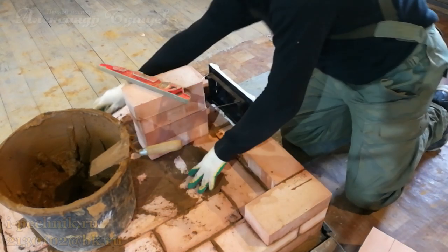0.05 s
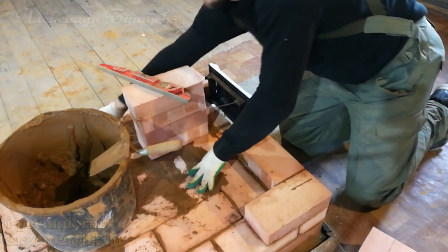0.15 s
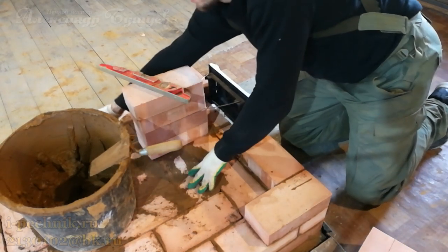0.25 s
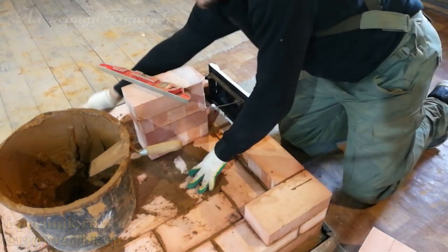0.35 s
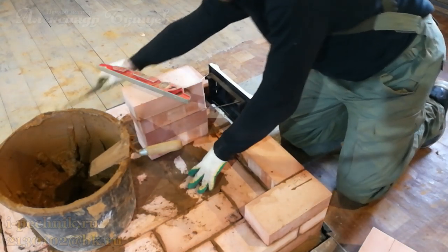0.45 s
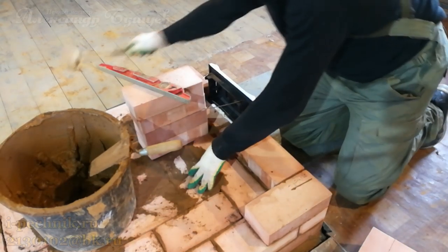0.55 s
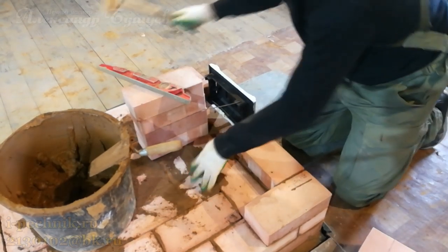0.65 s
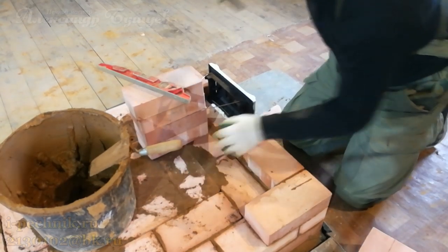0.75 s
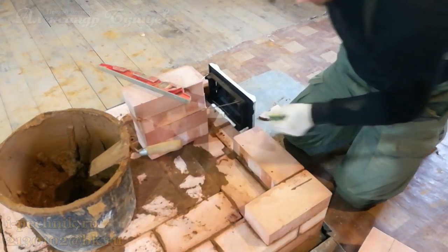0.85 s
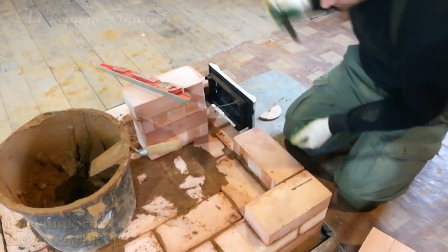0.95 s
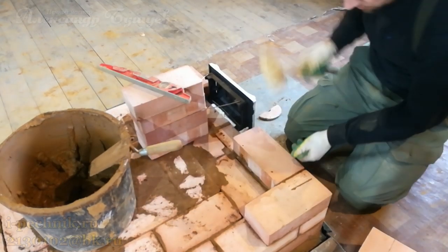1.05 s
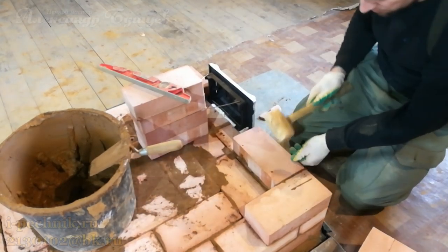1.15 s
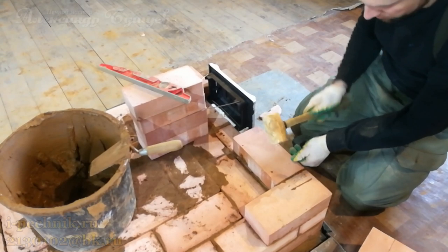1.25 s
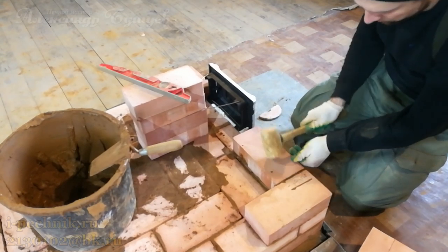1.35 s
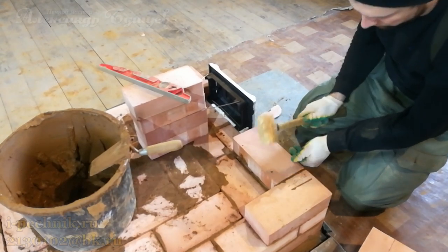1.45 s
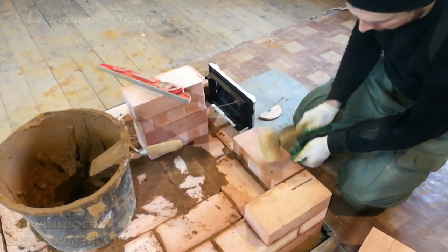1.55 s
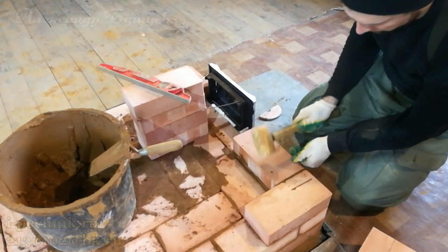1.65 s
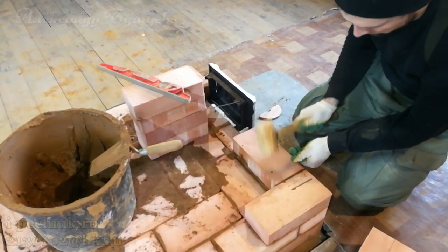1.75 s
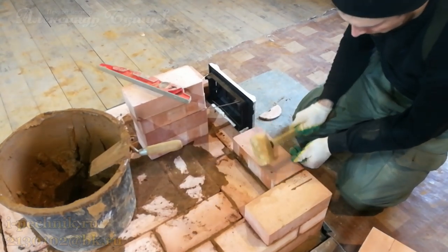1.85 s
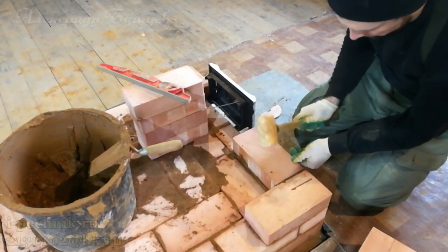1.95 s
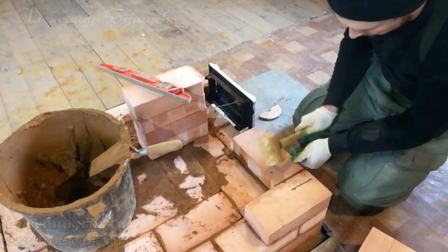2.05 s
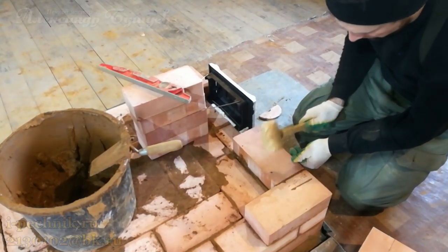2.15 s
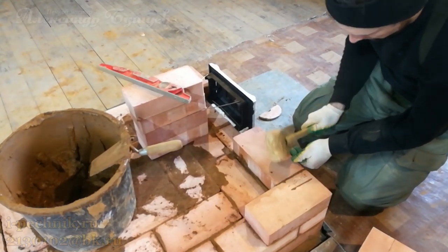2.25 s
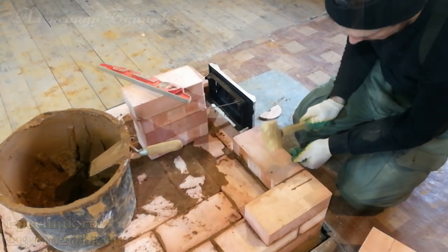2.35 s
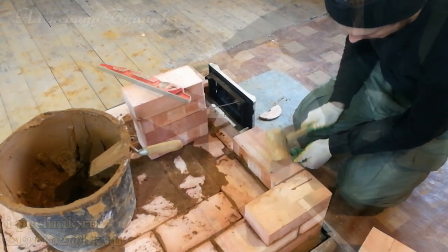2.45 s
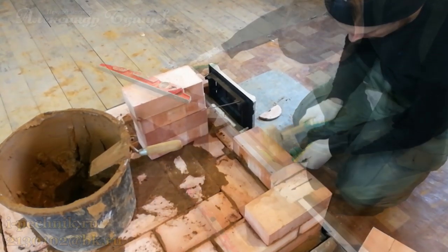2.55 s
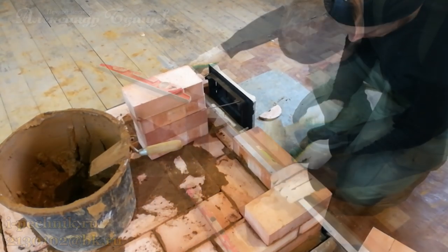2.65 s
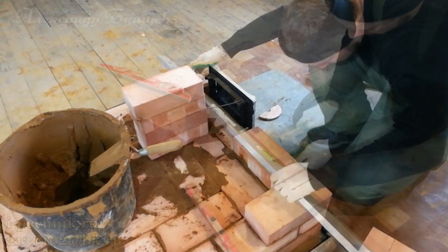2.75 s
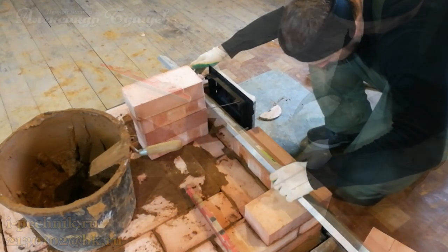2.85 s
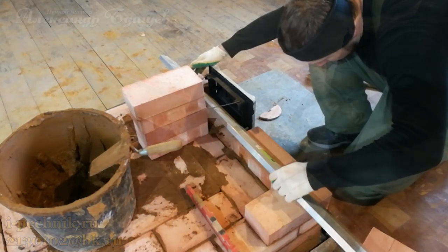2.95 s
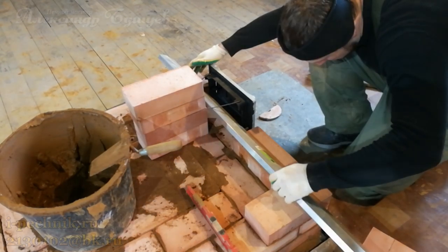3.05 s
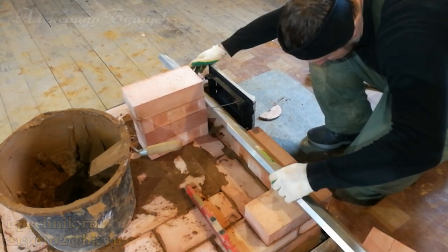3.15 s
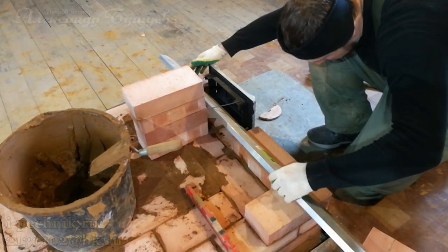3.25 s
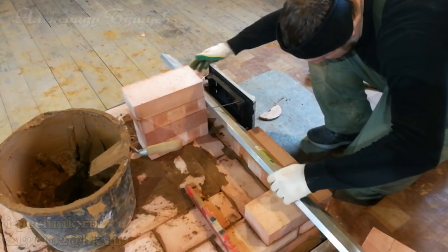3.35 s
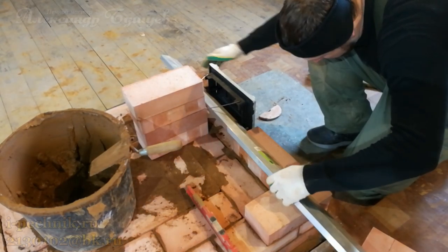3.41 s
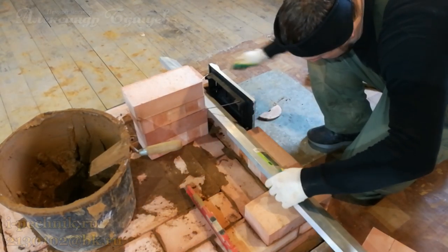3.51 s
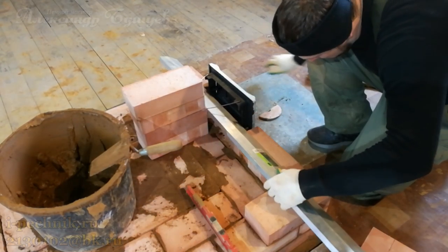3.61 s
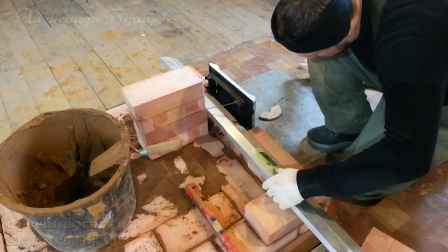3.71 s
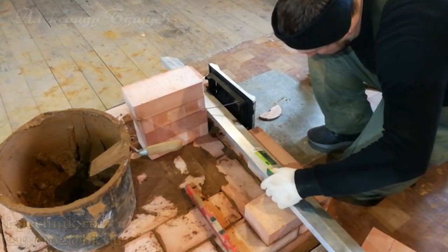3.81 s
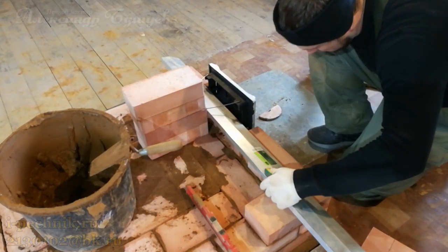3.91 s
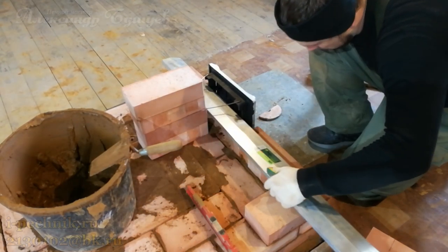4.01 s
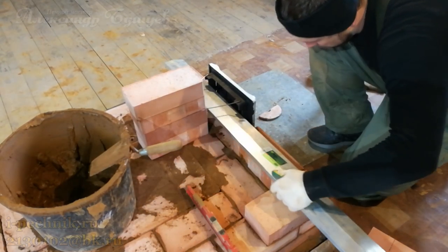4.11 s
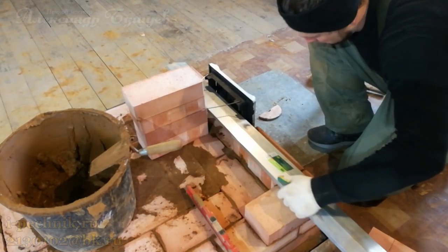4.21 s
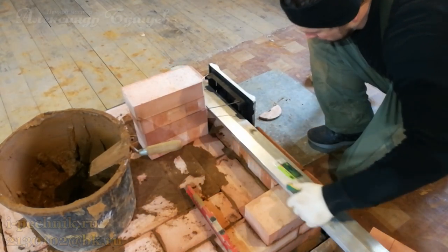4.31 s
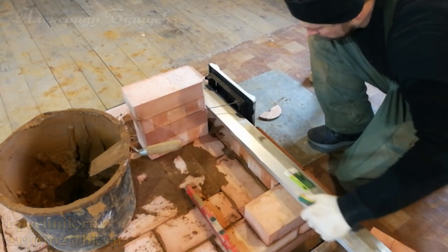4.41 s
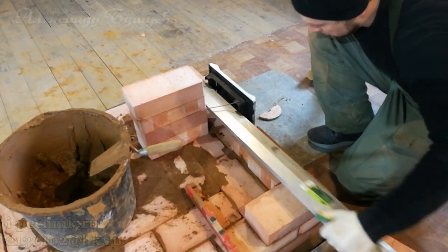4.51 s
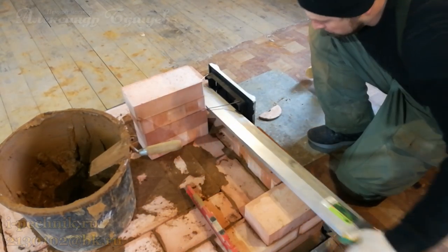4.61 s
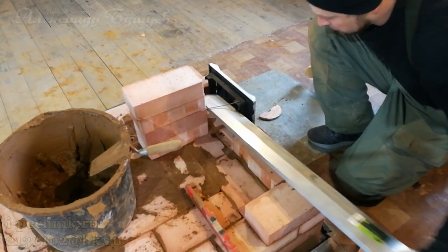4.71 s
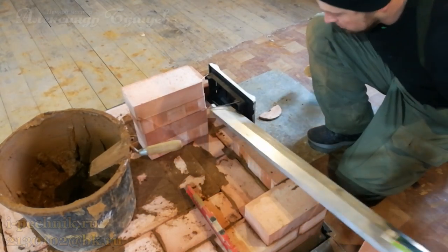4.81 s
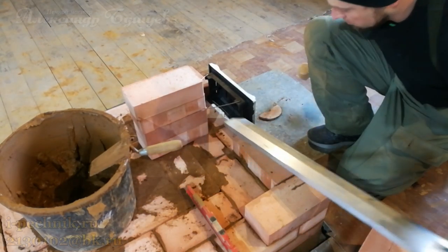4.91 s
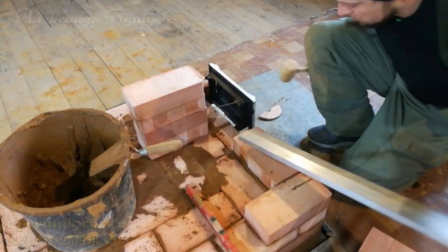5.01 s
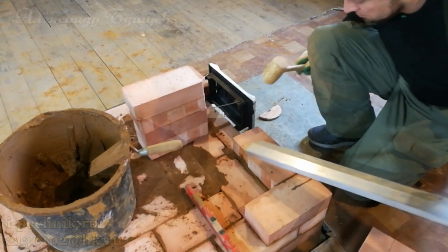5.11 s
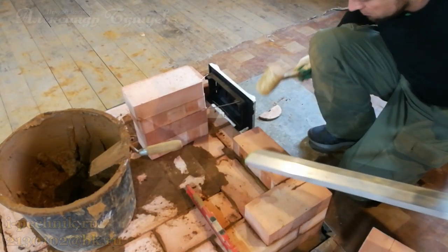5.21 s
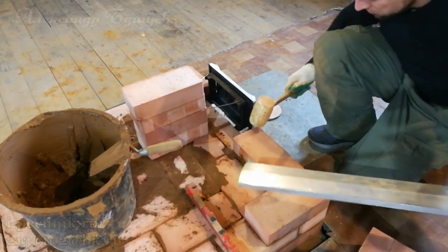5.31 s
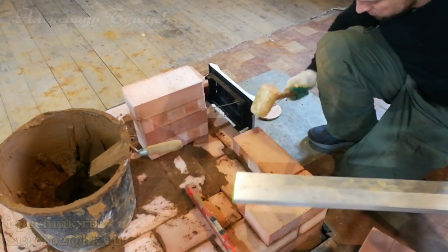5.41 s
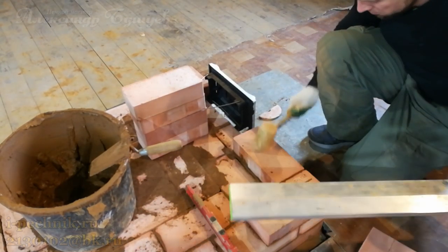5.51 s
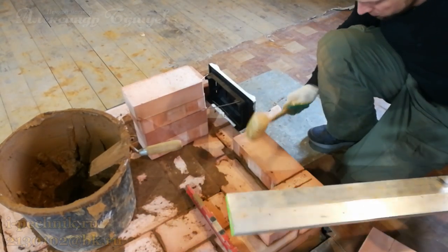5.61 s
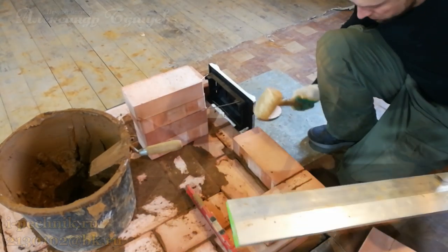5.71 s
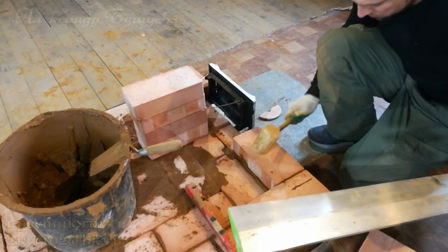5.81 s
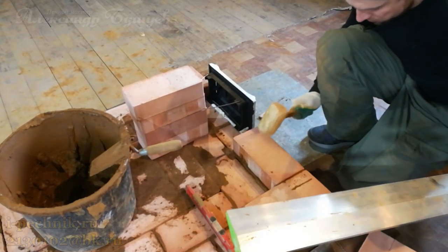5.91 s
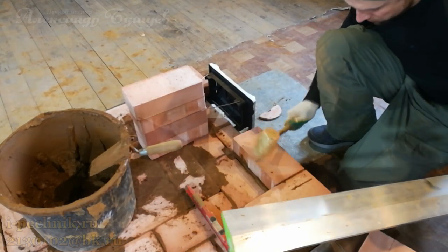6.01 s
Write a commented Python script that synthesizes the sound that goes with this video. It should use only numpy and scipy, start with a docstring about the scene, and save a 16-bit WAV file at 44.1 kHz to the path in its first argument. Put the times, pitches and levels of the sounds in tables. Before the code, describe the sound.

For the first second or so, work clothes rustle softly and gloves and soles scuff, over very quiet room air and a faint low hum that fades. From 1.3 to 2.9 seconds a rubber mallet taps a brick eight times, evenly, about four a second, the last weaker. Each is a dull thud with a slap and a short boom in the small room. From about 2.3 to 3.9 seconds a hollow aluminium level scrapes over grit in small catches, clinking faintly against an iron door around 3 seconds. It clatters on the brick with a brief metallic ring at 3.5, knocks more lightly at 4.1 and gives a sharp ringing tap at 4.6. Faint sleeve swishes and soft floorboard bumps lie between. Three harder mallet blows land at about 5.5, 5.7 and 6 seconds.

```python
"""A rubber mallet beds a brick in a small workshop: each impact swings brick and floor once, echoes off
walls and ceiling and excites the room's standing waves. A hollow aluminium level scrapes over the grit,
chatters against an iron firebox door, and rings in its tube modes as it is set down, knocked and lifted.
Three harder blows follow. The kneeling bricklayer's clothes rustle by friction, gloves and soles scuff,
and the boards bump as the weight shifts, over quiet room air and a brief low hum."""
import sys
import numpy as np
from scipy import signal
from scipy.fft import rfft, irfft, next_fast_len
from scipy.io import wavfile
from scipy.ndimage import uniform_filter1d

SR = 44100
rng = np.random.default_rng(int(sys.argv[2]) if len(sys.argv) > 2 else 0)


def master_out(mix):
    """Clip the mix to full scale and print it as 16-bit PCM to the path in sys.argv[1]."""
    frames = np.transpose(np.atleast_2d(mix))
    ceiling = np.clip(frames, -1, 1)
    pcm = np.round(ceiling * 32767).astype(np.int16)
    wavfile.write(sys.argv[1], SR, pcm)


N = 267543
T = np.arange(N) / SR
EVENT_T = T[:SR * 3 // 5]  # time axis of a single event


def mallet(room, slap_s=0.0013, grind_db=-15, grind_s=0.0045, grind_lag_s=0.008):
    """Impact excitation: rubber slaps the brick, which thuds, then grinds briefly into its bed."""
    # mallet blows: start_s, thud_db, slap_db, treble_db
    blows = [(1.3118, -26.5, -34.5, 0.5), (1.526, -23.5, -35, -0.5), (1.7455, -23.5, -31.5, -17),
             (1.9762, -23, -28.5, -7.5), (2.206, -26, -37, -6.5), (2.4159, -26.5, -35.5, -31),
             (2.6440, -27, -37, 1), (2.9191, -33, -42, -19), (5.4695, -20, -24, 2),
             (5.7288, -20.5, -22, -2), (5.9783, -22, -25.5, -1.5)]
    # spectrum of rubber slapping clay: frequency_hz, level_db
    slap_spectrum = [(200, 10), (520, 2), (680, -18), (830, 10.5), (1100, -14), (1400, 0), (1900, -13),
                     (2600, -4), (4500, -10), (6200, -11.5), (8000, -16), (10000, -13), (16000, -27)]
    clay = lambda f: along(slap_spectrum, f)
    thuds, slaps = np.zeros((2, N))
    impact = thud() + contact_click()
    for start_s, thud_db, slap_db, treble_db in blows:
        add(thuds, start_s, undb(thud_db) * impact)
        add(slaps, start_s, undb(slap_db) * crunch(clay, treble_db, slap_s, grain_db=2.5))
        grind = crunch(clay, treble_db, grind_s, grain_db=0.5)
        add(slaps, start_s + grind_lag_s, undb(slap_db + grind_db) * grind)
    # the upper part of the thud scatters about the room and differs between left and right
    scatter = signal.fftconvolve(low_cut(thuds, 140), room[0] - room[1])[:N]
    thuds = thuds + undb(-9.5) * np.array([[1], [-1]]) * scatter
    return thuds + place(low_cut(slaps, 140), room, wet_db=5, pan_db=0.2)


def thud(pitch_hz=265, width_s=0.0019, peak_s=0.0025, boom_db=-9):
    """Transient response: one swing of brick and floor, its early reflections and standing waves."""
    # reflections from walls and ceiling: delay_s, gain
    reflections = [(.0052, 0.2), (.0082, 0.059), (0.019, 0.12), (0.022, 0.34), (.0265, .12), (0.0518, .2)]
    # standing waves of the room: pitch_hz, level_db, t60_s, swell_s
    room_modes = [(58.9, -1, 0.24, 0.077), (72.5, 15, 0.18, 0.16), (91.9, 6.5, 0.22, 0.054),
                  (117.4, -4.5, 0.25, 0.026), (138.1, 2, 0.22, 0.062), (183.2, 1, 0.18, 0.017),
                  (198.6, 1, 0.24, 0.069), (232, -9, 0.24, 0.051), (289.3, -6.5, 0.25, 0.016),
                  (318, -16, 0.068, 0.016), (367.6, -18, 0.29, 0.004), (420.5, -5.5, 0.081, 0.0031)]
    pulse = np.cos(2 * np.pi * pitch_hz * (EVENT_T - peak_s)) * bell(EVENT_T - peak_s, width_s)
    pulse *= onset(0.00075)
    echoes = sum(gain * np.interp(EVENT_T - delay_s, EVENT_T, pulse, left=0)
                 for delay_s, gain in reflections)
    pitch_hz, level_db, t60_s, swell_s = np.transpose(room_modes)
    phases = np.pi * np.arange(len(pitch_hz))  # neighbouring modes arrive with opposite signs
    swell = 1 - np.exp(-np.outer(1 / swell_s, EVENT_T) ** 2)
    boom = damped_modes(pitch_hz, level_db, t60_s, phases) * swell
    return pulse + echoes + undb(boom_db) * boom.sum(0)


def contact_click(level_db=-12, click_hz=900, click_s=0.00027, edge_hz=3800, edge_s=0.00012):
    """Heavily damped vibration: the mallet's first touch draws a dry, bright click from the brick."""
    damped = lambda hz, decay_s: np.sin(2 * np.pi * hz * EVENT_T) * np.exp(-EVENT_T / decay_s)
    return undb(level_db) * (damped(click_hz, click_s) + undb(-3) * damped(edge_hz, edge_s))


def level_knocks(room):
    """Modal excitation: the contact point weights the tube's modes; the metal clatters on the brick."""
    # tube modes, with a level for each contact point: pitch_hz, t60_s, face_db, edge_db, end_db
    tube_modes = [(650, .21, 1, -20, -32), (1078, .22, -9, -10, -2), (1312, .15, -11, -12, -5),
                  (1456, .17, -2, -11, -15), (2319, .32, -19, -12, -5), (9761, .23, -45, -32, -15),
                  (290, .2, -3, -15, -45), (425, .15, -7, -22, -40), (549, .5, -22, -24, -28),
                  (861, .17, -13, -15, -24), (1028, .26, -18, 1, -16), (1651, .5, -17, -22, -30),
                  (1745, .13, 0, -14, -22), (1857, .12, -4, -20, -26), (1949, .26, -6, -22, -30),
                  (2045, .15, -9, -15, -26), (2180, .15, -10, -24, -26), (2995, .3, -20, -15, -22),
                  (3370, .2, -16, -15, -24), (3548, .17, -16, -24, -28), (3946, .27, -34, -28, -27),
                  (4667, .2, -36, -24, -27), (4947, .17, -36, -23, -21), (6223, .15, -36, -26, -17),
                  (10650, .15, -45, -32, -23)]
    # knocks on the brick: start_s, contact_point, ring_db, clatter_db, treble_db, decay_s
    knocks = [(3.489, "face", -29.5, -15.5, -33, 0.037), (3.685, "face", -57.5, -39.5, -10.5, 0.033),
              (4.078, "edge", -39.5, -30, -17, 0.041), (4.212, "edge", -60, -35.5, -13, 0.014),
              (4.6189, "end", -23, -20.5, 10, 0.0034)]
    # spectrum of metal clattering on brick: frequency_hz, level_db
    clatter_spectrum = [(100, -24.5), (260, -12), (600, -10), (1200, -1.5), (2000, -6), (3200, -0.5),
                        (4500, -5.5), (6500, -2), (8000, -9), (10000, 1), (13000, -5), (16000, -0.5)]
    rings, clatter = np.zeros((2, N)), np.zeros(N)
    pitch_hz, t60_s, *weights_db = np.transpose(tube_modes)
    mode_db = dict(zip(("face", "edge", "end"), weights_db))
    for start_s, contact_point, ring_db, clatter_db, treble_db, decay_s in knocks:
        add(rings, start_s, undb(ring_db) * struck_metal(pitch_hz, mode_db[contact_point], t60_s))
        burst = crunch(lambda f: along(clatter_spectrum, f), treble_db, decay_s, grain_db=3)
        add(clatter, start_s, undb(clatter_db) * burst)
    rings = place(rings, room, wet_db=-6.5, pan_db=-4)
    clatter = place(clatter, room, wet_db=-0.5, pan_db=0.3)
    return low_cut(rings + clatter, 120)


def grit(room, drag_start_s=2.3, drag_end_s=3.86, drag_db=-71.5, rise_db_per_s=1.5):
    """Stick-slip friction: sand catches under the level and excites its tube; a few crumbs tick."""
    # catches on the sand: start_s, level_db, treble_db, decay_s
    catches = [(2.292, -51.5, 0.5, 0.028), (2.324, -48.5, 0, 0.033), (2.49, -62, 7.5, 0.016),
               (2.528, -50.5, 5.5, 0.012), (2.58, -42, -1.5, 0.02), (2.845, -49.5, 0.5, 0.018),
               (2.92, -37.5, 0, 0.034), (2.96, -28.5, 6.5, 0.0076), (3.142, -38.5, -3, 0.013),
               (3.166, -51.5, 1, .03), (3.236, -48.5, -1, 0.041), (3.277, -32.5, 0, 0.014),
               (3.351, -40, -1, 0.01), (3.723, -45, -6, 0.012), (4.093, -45, 7, 0.01)]
    # spectrum of gritty friction: frequency_hz, level_db
    sand_spectrum = [(150, -33), (350, -8.5), (500, -5), (700, -15), (1100, 3), (1800, 0), (2500, -5.5),
                     (3300, -0.5), (5000, -5.5), (6500, -8), (8200, -4.5), (10000, -1), (16000, -5.5)]
    # tube resonances that colour the friction: pitch_hz, width_hz, nominal_boost_db
    resonances = [(540, 21, 2.3), (1107, 15, 9.2), (1390, 50, 3.2), (1657, 45, 8), (1746, 130, 9),
                  (1990, 30, 8.7), (3008, 53, 12), (3400, 60, 5), (4386, 52, 7.9), (5300, 73, 11),
                  (6160, 120, 8.1), (6570, 230, 9.9)]
    # ticks of crumbs: start_s, level_db
    ticks = [(.577, -61), (.953, -73), (.974, -57.5), (1.655, -80)]
    sand = lambda f: along(sand_spectrum, f)
    tube = lambda f, grip: sand(f) + sum(weight * boost_db / (1 + (2 * (f - hz) / width_hz) ** 2)
                                         for weight, (hz, width_hz, boost_db) in zip(grip, resonances))
    out = np.zeros(N)
    # each catch grips at another spot, which favours other resonances
    grips = rng.uniform(0.4, 1.6, (len(catches), len(resonances)))
    for (start_s, level_db, treble_db, decay_s), grip in zip(catches, grips):
        scrape = crunch(lambda f: tube(f, grip), treble_db, decay_s, grain_db=6)
        add(out, start_s, undb(level_db) * scrape * onset(0.0034))
    for start_s, level_db in ticks:
        add(out, start_s, undb(level_db) * crunch(sand, treble_db=14.5, decay_s=0.0044, grain_db=2))
    # between catches the level drags faintly, pressed harder as it goes
    drag = shape(grains(N, spread_db=7), lambda f: undb(tube(f, grips.mean(0)) - 6 * treble(f)))
    sliding = (T > drag_start_s) & (T < drag_end_s)
    out += undb(drag_db + rise_db_per_s * (T - drag_start_s)) * unit(drag) * sliding
    return place(out, room, wet_db=3.5, pan_db=0)


def firebox_door(room, chatter_s=0.0054, damping_s=0.06):
    """Forced vibration: the level chatters on the cast iron and, leaning on it, damps its ring."""
    # modes of the free door: pitch_hz, level_db, t60_s
    door_modes = [(1085, -8, 0.14), (1210, -9.5, 0.2), (1680, -14.5, 0.16), (1840, 0.5, 0.14),
                  (2740, -10, 0.22), (2850, -16, 0.23), (3164, -5, 0.2), (3380, -7.5, 0.064),
                  (3650, -10, 0.11)]
    # nudges from the level: start_s, level_db
    nudges = [(2.673, -47), (2.799, -55.5), (2.931, -47.5), (3.041, -41.5), (3.146, -53.5), (3.367, -54.5)]
    out = np.zeros(N)
    iron = struck_metal(*np.transpose(door_modes))[0] * np.exp(-EVENT_T / damping_s)
    for start_s, level_db in nudges:
        chatter = crunch(np.zeros_like, treble_db=0, decay_s=chatter_s, grain_db=6.5)
        clink = signal.fftconvolve(chatter, iron)
        clink *= np.sqrt(np.sum(iron ** 2) / np.sum(clink ** 2))
        add(out, start_s, undb(level_db) * clink)
    return place(out, room, wet_db=-0.5, pan_db=3)


def clothes(room, flutter_db=3, crumbs_per_s=25, crumb_s=0.0014, gain_db=2):
    """Friction noise: fibres slip past each other in uneven catches, and crumbs tick at random."""
    middle_gain, treble_gain = rubbing()
    catches = unit(uniform_filter1d(rng.standard_normal(N), size=500))
    fibres = grains(N, spread_db=8.1) * undb(flutter_db * catches)
    impulses = (rng.random(N) < crumbs_per_s / SR) * undb(6 + 5 * rng.standard_normal(N))
    crumbs = signal.fftconvolve(impulses, np.exp(-EVENT_T / crumb_s))[:N] * rng.standard_normal(N)
    # spectrum of rubbing cloth: frequency_hz, level_db
    cloth_spectrum = [(120, -15.5), (200, -16.5), (283, -9.5), (465, -16), (791, -11.5), (1740, -5),
                      (2170, -5.5), (2650, -4), (7410, -7), (10300, -2), (16000, -6)]
    rustle = shape(unit(fibres) + crumbs, lambda f: undb(along(cloth_spectrum, f)))
    rustle = unit(place(rustle, room, wet_db=8, pan_db=0))
    bright = shape(rustle, treble)
    return undb(gain_db) * (middle_gain * unit(rustle - bright) + treble_gain * unit(bright))


def rubbing(settle_db_per_s=250):
    """Incoherent addition: movements sum in power to give the cloth's middle and treble envelopes."""
    # reaching for the mallet: time_s, middle_db, treble_db
    reach = [(0.0, -56.5, -47), (0.116, -64, -64), (0.198, -60, -60), (0.266, -67.5, -70),
             (0.282, -70, -62.5), (0.424, -72.5, -65), (0.53, -92, -82)]
    # sitting back with it: time_s, middle_db, treble_db
    sit_back = [(0.53, -87, -86), (0.56, -64, -59.5), (0.936, -90, -63), (0.984, -65.5, -52.5),
                (1.156, -61, -57), (1.242, -64, -70.5), (1.386, -55.5, -54.5), (1.444, -54.5, -54),
                (1.51, -67, -74)]
    # swishes of a sleeve: peak_s, level_db, treble_boost_db, width_s
    swishes = [(3.78, -76.5, 14, 0.035), (4.3, -68.5, -4, 0.055), (5.015, -80.5, -1.5, .02),
               (5.126, -78.5, 13, 0.029), (5.678, -68, -7.5, 0.087)]
    power = np.zeros((2, N))
    for movement in (reach, sit_back):
        time_s, *bands_db = np.transpose(movement)
        contours_db = np.array([np.interp(T, time_s, db) for db in bands_db])
        outside_s = np.abs(T - np.clip(T, time_s[0], time_s[-1]))
        power += undb(contours_db - settle_db_per_s * outside_s) ** 2
    for peak_s, level_db, treble_boost_db, width_s in swishes:
        power += np.outer(undb([level_db, level_db + treble_boost_db]), bell(T - peak_s, width_s)) ** 2
    return np.sqrt(power)


def scuffs():
    """Sliding friction: gloves and soles give short swells of mid-band noise."""
    # scuffs: peak_s, level_db, centre_hz, width_s
    slides = [(0.132, -54, 2520, 0.023), (0.194, -45, 1760, 0.0047), (0.213, -58, 2020, 0.037),
              (0.617, -57, 2680, 0.013), (0.729, -58, 2240, .015), (4.046, -65, 2160, 0.03),
              (5.093, -66.5, 2120, 0.016)]
    return noise_swells(slides, log_bandwidth=0.35)


def floor_bumps():
    """Changing load: shifting weight draws soft swells of low noise from the boards."""
    # bumps: peak_s, level_db, centre_hz, width_s
    bumps = [(.42, -71, 262, 0.042), (0.588, -52.5, 29.8, 0.018), (.71, -65, 39.7, .07),
             (3.72, -67, 268.7, 0.045), (3.758, -70, 79, .07), (4.024, -62.5, 169, 0.031),
             (4.035, -65.5, 80, 0.071), (4.929, -65, 183, 0.047)]
    return noise_swells(bumps, log_bandwidth=0.33)


def background(air_db=-78.5, hum_hz=93, hum_db=-71.5, fade_s=0.57):
    """Ambient noise: a diffuse field of quiet room air, and a low hum that fades away."""
    # spectrum of the air: frequency_hz, relative_db
    air_spectrum = [(15, -27.5), (25, 6.5), (363, -14.5), (545, -20), (1070, -13), (3430, -18),
                    (7510, -21.5), (14800, -20), (16000, -33.5)]
    air = unit(shape(diffuse(N), lambda f: undb(along(air_spectrum, f))))
    hum = np.sqrt(2) * np.sin(2 * np.pi * hum_hz * T) * bell(T, fade_s)
    return undb(air_db) * air + undb(hum_db) * hum


def room_response(build_s=0.0027):
    """Reverberation: a diffuse impulse response of unit energy, each octave with its own decay."""
    # reverberation times: frequency_hz, t60_s
    decay_times = [(60, 0.81), (150, 0.39), (400, 0.28), (1000, 0.18), (2500, 0.28), (6500, 0.28),
                   (16000, 0.21)]
    noise, tail = diffuse(len(EVENT_T)), 0
    centres_hz = np.geomspace(60, 16000, 9)
    for hz, weights in zip(centres_hz, np.eye(len(centres_hz))):
        band = shape(noise, lambda f: along(np.c_[centres_hz, weights], f))
        tail += band * np.exp(-np.log(1000) * EVENT_T / along(decay_times, hz))
    tail *= 1 - np.exp(-(EVENT_T / build_s) ** 2)
    return tail / np.sqrt(np.sum(tail ** 2) / 2)


def struck_metal(pitch_hz, level_db, t60_s, skew_rad=0.18, touch_s=0.0006):
    """Modal superposition: each mode arrives left and right a little out of phase."""
    phase = rng.uniform(0, 2 * np.pi, len(pitch_hz))
    skew = skew_rad * np.minimum(pitch_hz / 1500, 1) * rng.choice([-1, 1], len(pitch_hz))
    sides = [damped_modes(pitch_hz, level_db, t60_s, phase + side * skew).sum(0) for side in (1, -1)]
    return np.array(sides) * onset(touch_s)


def damped_modes(pitch_hz, level_db, t60_s, phase):
    """Free vibration: exponentially decaying sinusoids, one row a mode."""
    swing = np.sin(2 * np.pi * np.outer(pitch_hz, EVENT_T) + phase[:, None])
    return undb(level_db)[:, None] * swing * np.exp(-np.log(1000) * np.outer(1 / t60_s, EVENT_T))


def grains(size, spread_db):
    """Contact noise: tiny impacts with log-normally distributed sizes."""
    return rng.standard_normal(size) * undb(spread_db * rng.standard_normal(size))


def crunch(spectrum_db, treble_db, decay_s, grain_db):
    """Exponential decay of coloured contact noise."""
    noise = shape(grains(len(EVENT_T), grain_db), lambda f: undb(spectrum_db(f)))
    fade = np.exp(-EVENT_T / decay_s)
    burst = unit(noise * fade) * np.sqrt(np.mean(fade ** 2))
    return shape(burst, lambda f: undb(treble_db * treble(f)))


def noise_swells(events, log_bandwidth):
    """Amplitude modulation: bands of diffuse noise rise and fall under Gaussian envelopes."""
    out, middle_s = np.zeros((2, N)), EVENT_T.mean()
    for peak_s, level_db, centre_hz, width_s in events:
        band = shape(diffuse(len(EVENT_T)), lambda f: bell(np.log((f + 1) / centre_hz), log_bandwidth))
        swell = undb(level_db) * unit(band) * bell(EVENT_T - middle_s, width_s)
        add(out, peak_s - middle_s, swell[:, EVENT_T >= middle_s - peak_s])
    return out


def diffuse(size, corner_hz=520):
    """Diffuse-field coherence: stereo noise alike in the bass, unrelated in the treble."""
    mid, side = rng.standard_normal((2, size))
    mid = shape(mid, lambda f: np.sqrt(1 - treble(f, corner_hz) / 2))
    side = shape(side, lambda f: np.sqrt(treble(f, corner_hz) / 2))
    return np.array([mid + side, mid - side])


def place(x, room, wet_db, pan_db):
    """Direct plus reverberant field; a positive level difference leans left."""
    wet = signal.fftconvolve(np.atleast_2d(x), room, axes=1)[:, :N]
    return (x + undb(wet_db) * wet) * undb(np.array([[pan_db], [-pan_db]]) / 2)


def from_right(x, lag_s=0.00003):
    """Path difference: sound from the right reaches the left side later."""
    return np.array([shape(x[0], lambda f: np.exp(-2j * np.pi * f * lag_s)), x[1]])


def low_cut(x, corner_hz):
    """Radiation efficiency: small bodies give off little bass."""
    return signal.sosfilt(signal.butter(3, corner_hz, "high", fs=SR, output="sos"), x)


def shape(x, gain):
    """Filter by a gain that is a function of frequency."""
    size = next_fast_len(x.shape[-1] + 2048)
    return irfft(rfft(x, size) * gain(np.fft.rfftfreq(size, 1 / SR)), size)[..., :x.shape[-1]]


def along(points, hz):
    """Interpolate (frequency_hz, value) points on a log-frequency axis."""
    frequencies, values = np.transpose(points)
    return np.interp(np.log(np.maximum(hz, 1)), np.log(frequencies), values)


def treble(hz, corner_hz=3200):
    """Power response of a first-order high-pass."""
    return hz ** 2 / (hz ** 2 + corner_hz ** 2)


def bell(offset, width):
    """Gaussian curve with a peak of 1."""
    return np.exp(-(offset / width) ** 2 / 2)


def onset(rise_s):
    """Exponential rise from 0 to 1."""
    return 1 - np.exp(-EVENT_T / rise_s)


def undb(db):
    """Decibels to gain."""
    return 10 ** (np.asarray(db) / 20)


def unit(x):
    """Scale to rms 1."""
    return x / np.sqrt(np.mean(x ** 2))


def add(track, start_s, x):
    """Mix a sound in at a time."""
    i = max(int(round(start_s * SR)), 0)
    track[..., i:i + x.shape[-1]] += x[..., :max(N - i, 0)]


def scene():
    """Superposition: all sources add in one room."""
    room = room_response()
    work = mallet(room) + from_right(level_knocks(room)) + firebox_door(room) + grit(room)
    return work + clothes(room) + scuffs() + floor_bumps() + background()


def record(dry, top_hz=15900):
    """Band limiting: a steep elliptic low-pass removes the highest treble."""
    return signal.sosfilt(signal.ellip(10, 0.2, 70, top_hz, fs=SR, output="sos"), dry)


dry = scene()
out = record(dry)
master_out(out)
```